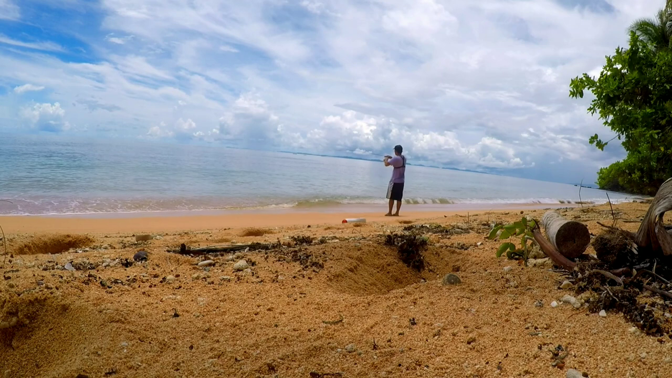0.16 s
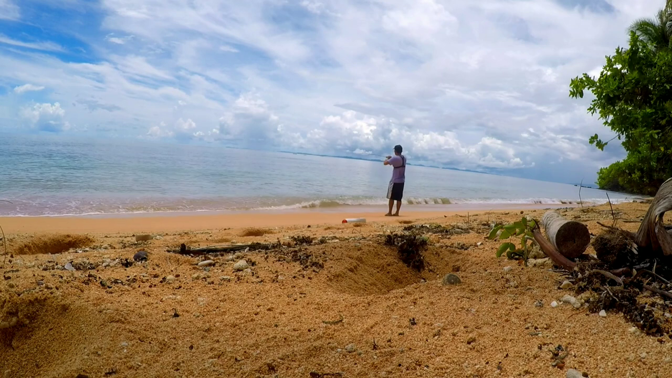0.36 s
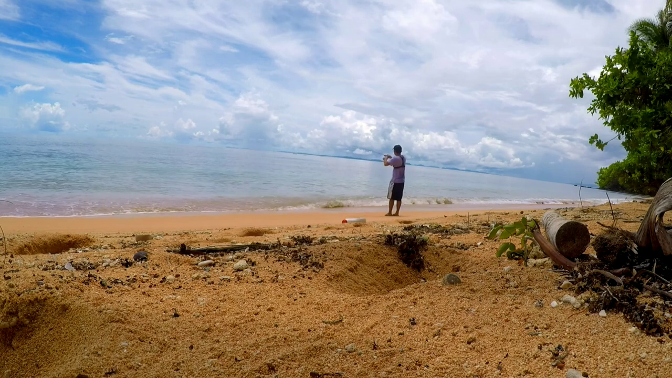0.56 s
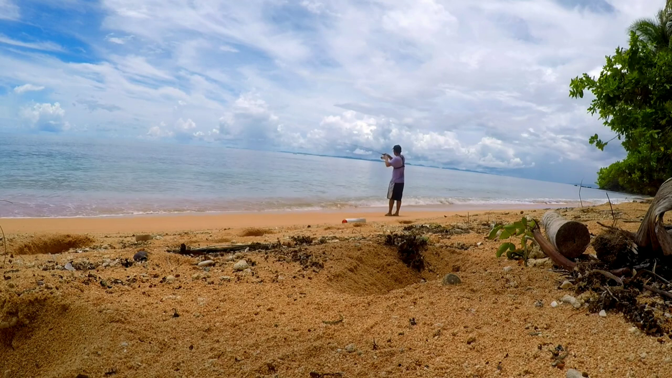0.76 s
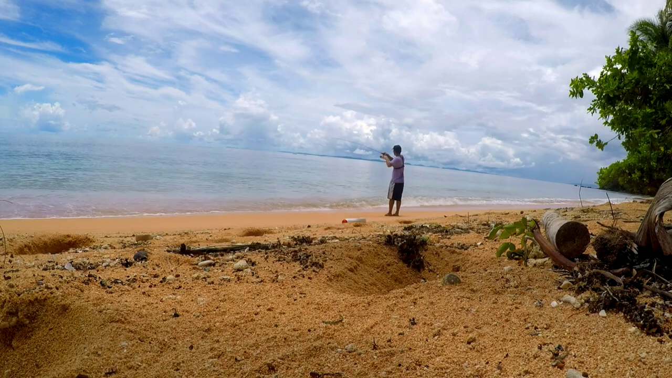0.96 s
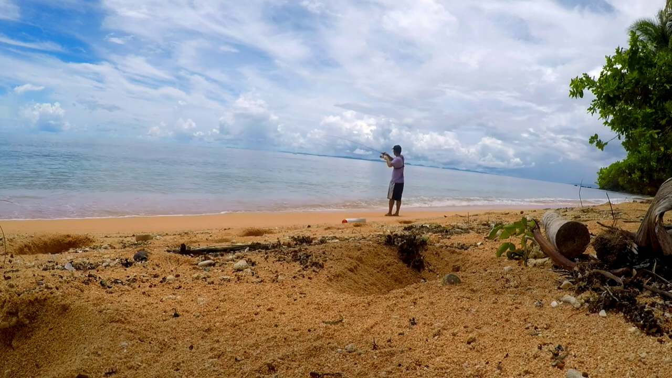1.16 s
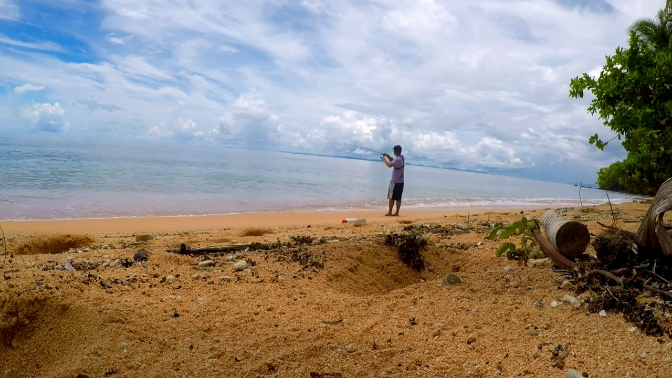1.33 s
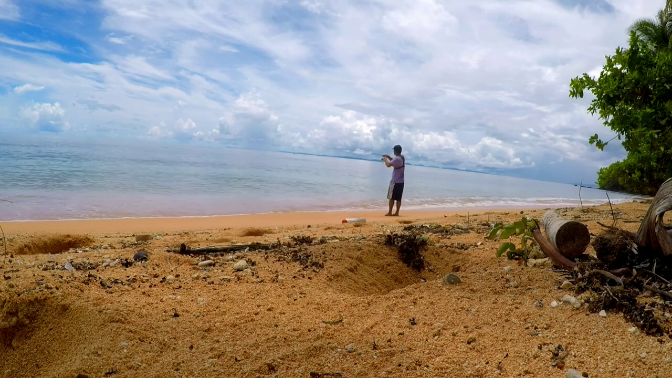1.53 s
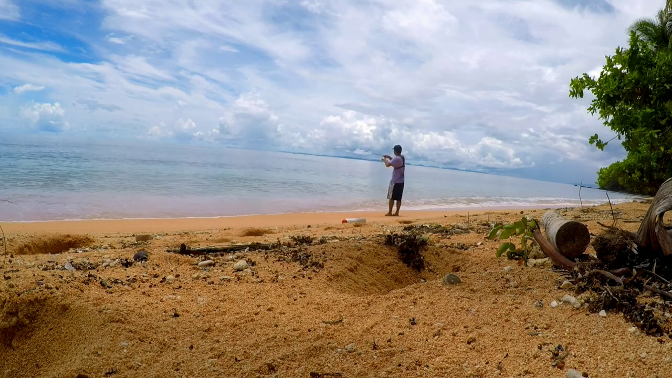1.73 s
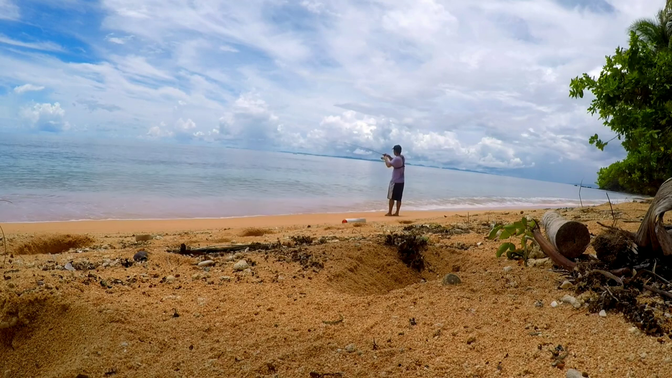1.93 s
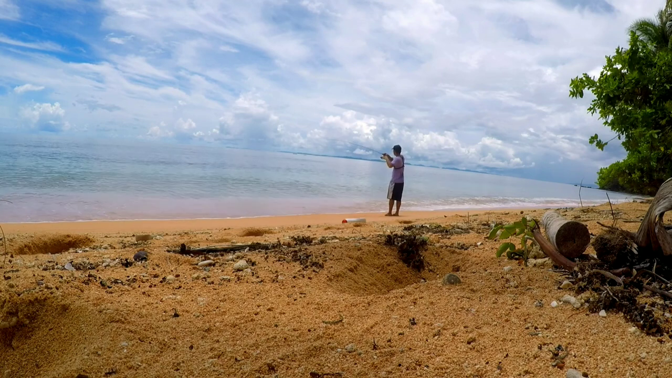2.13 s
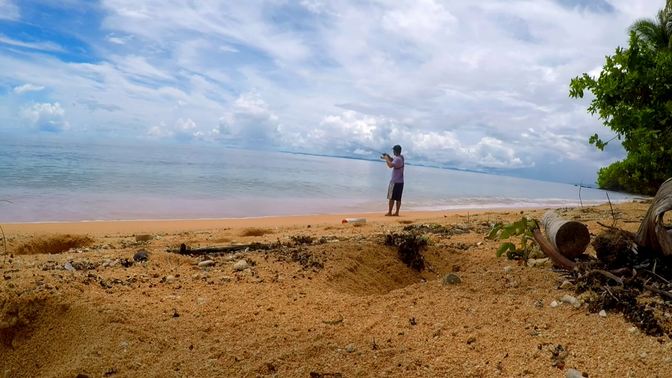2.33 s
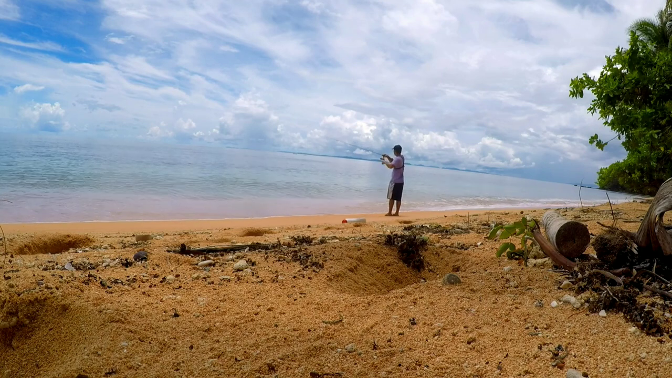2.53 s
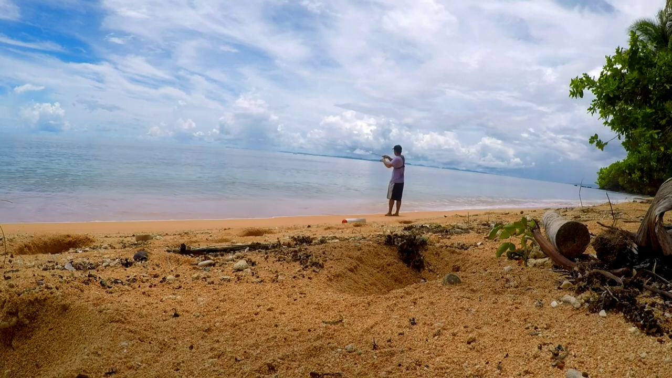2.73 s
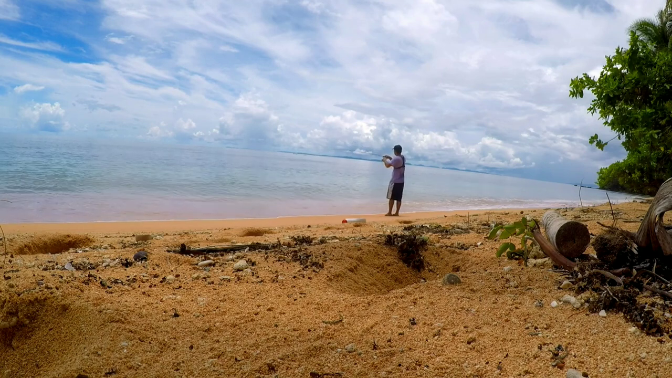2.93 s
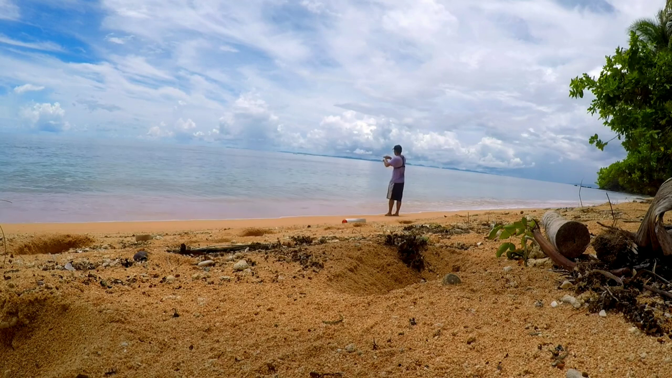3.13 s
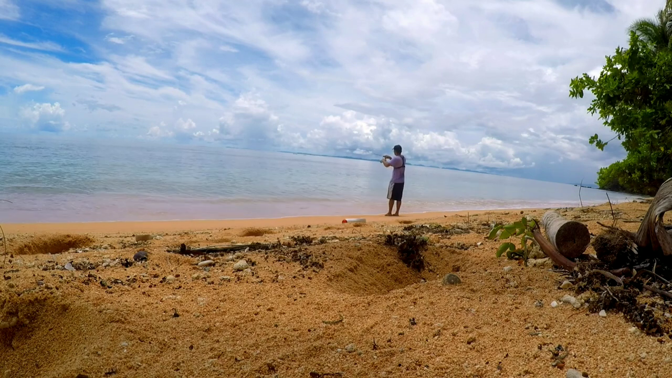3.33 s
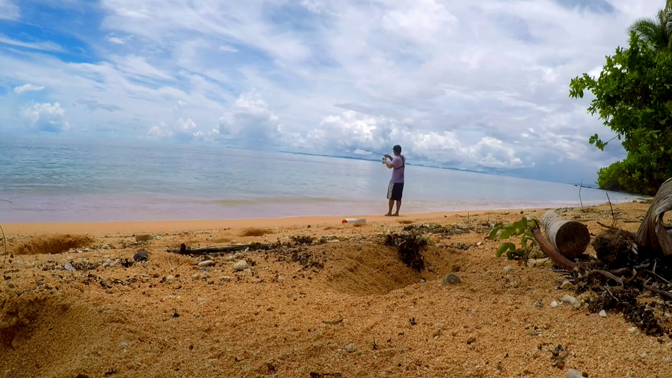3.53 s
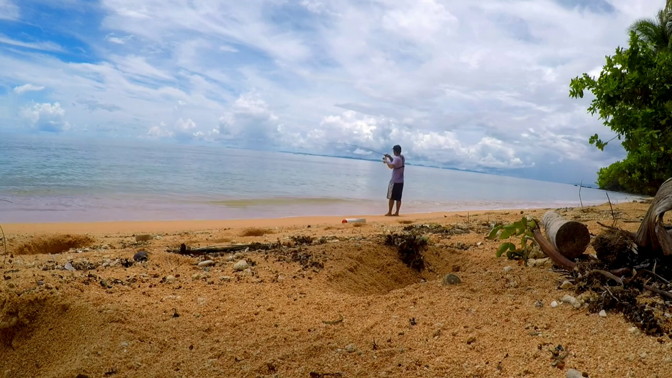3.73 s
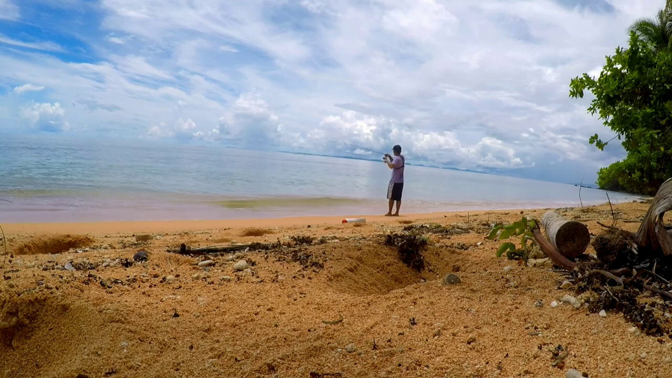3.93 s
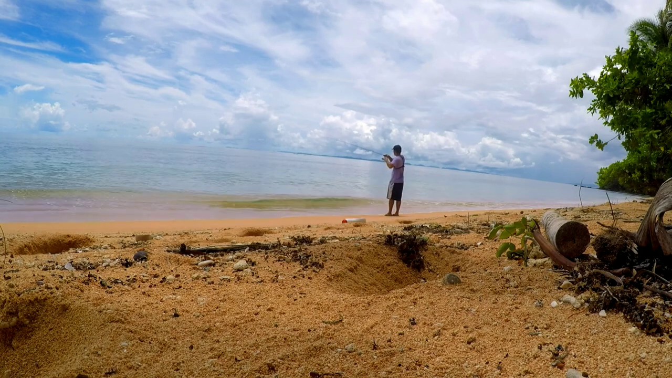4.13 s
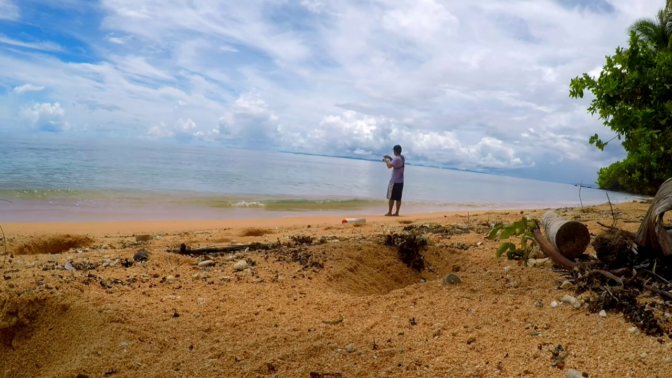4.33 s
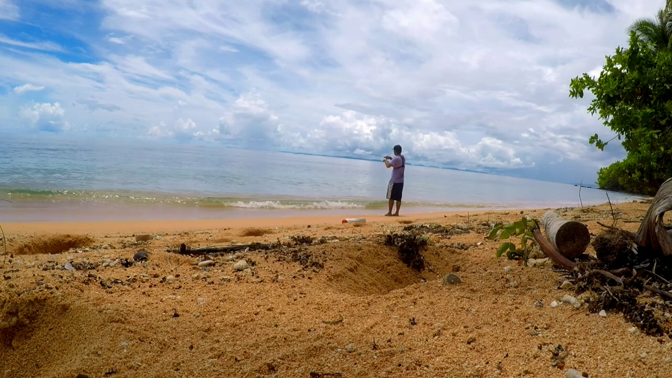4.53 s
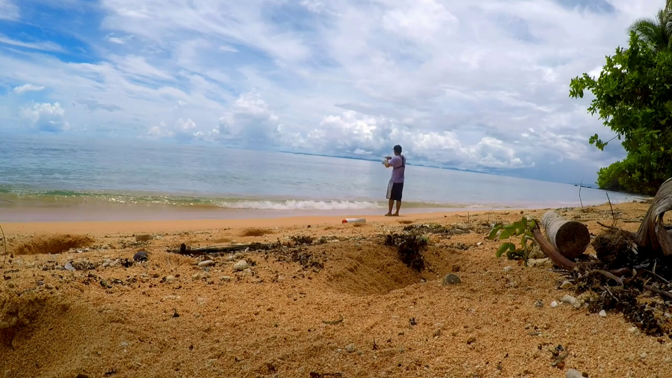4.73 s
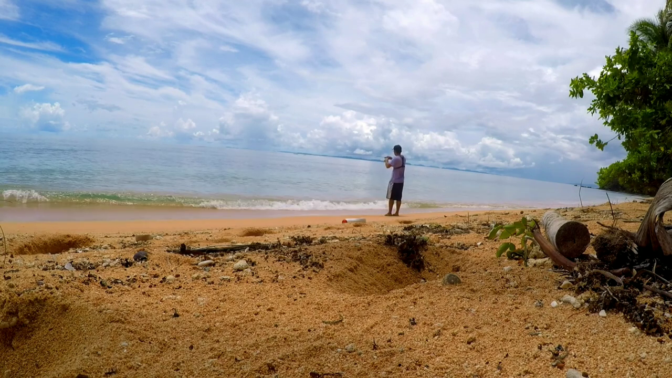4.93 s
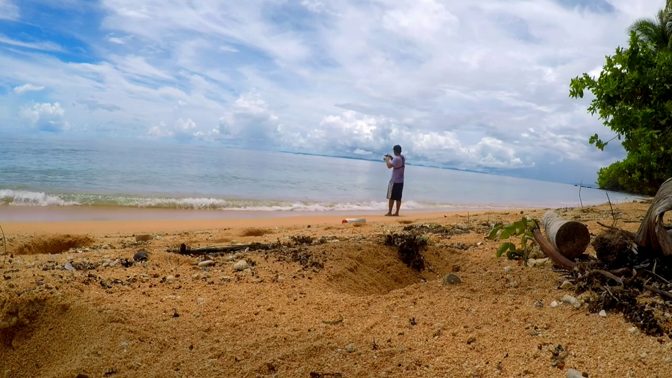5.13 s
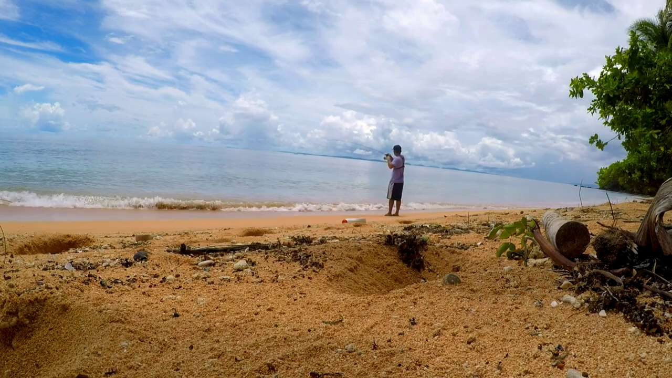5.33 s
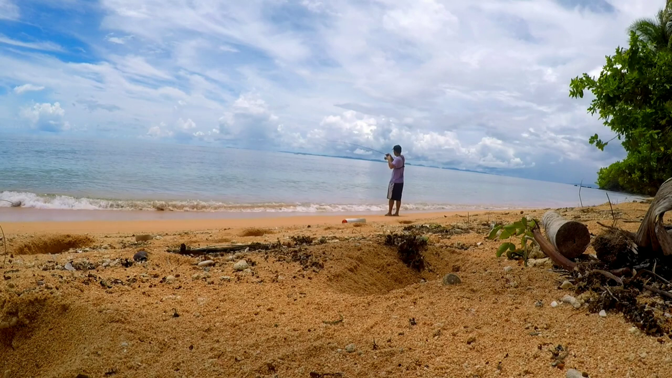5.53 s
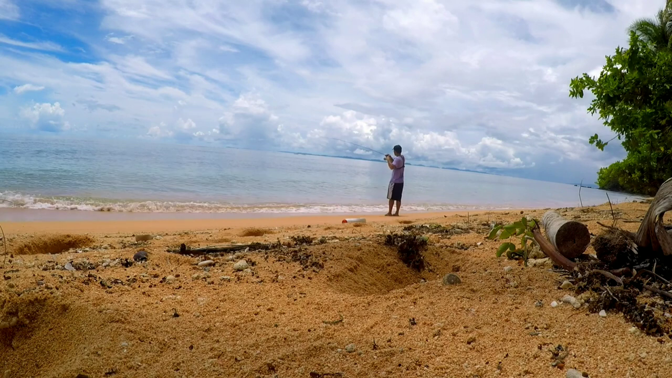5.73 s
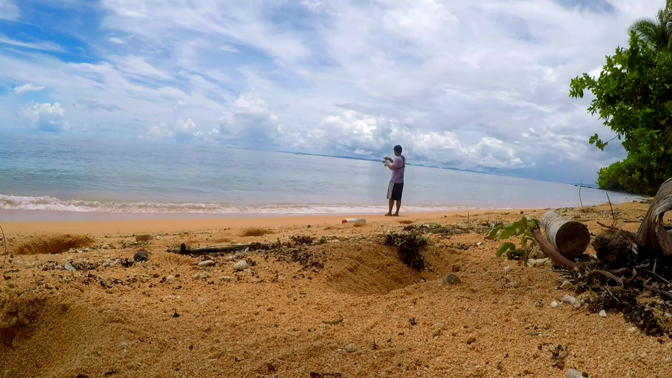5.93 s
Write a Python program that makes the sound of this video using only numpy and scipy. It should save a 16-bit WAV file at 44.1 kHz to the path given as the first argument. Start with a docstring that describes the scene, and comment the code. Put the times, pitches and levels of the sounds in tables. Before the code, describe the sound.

Stereo outdoor microphone near the water's edge: a low, throbbing distant motor hum and soft distant surf run throughout. A little wave slops and gurgles first, quietening for a couple of seconds. A weak ripple leads to a stronger breaker, starting at left and spreading across the front, full of bubbly knocks, splash and hissing foam. Barely noticeable wind; a bright, close water plop finishes it.

```python
"""A small wave breaks straight ahead on a sandy beach and a ripple follows; a second, louder one breaks
far left, then ahead, peeling off to the left. Filtered noise and ringing bubbles give each wave its churn,
gurgle, splash and fizzing foam; single bubbles make the thumps and a late plop. Beneath lie a far shoreline
of patchy noise, a distant engine of beating harmonics and faint wind of low noise."""
import sys
import numpy as np
from scipy import signal
from scipy.fft import rfft, irfft, next_fast_len
from scipy.io import wavfile
from scipy.ndimage import uniform_filter1d, map_coordinates

SR = 44100
rng = np.random.default_rng(int(sys.argv[2]) if len(sys.argv) > 2 else 0)


def master(y):
    """Save y as 16-bit WAV."""
    cut = np.clip(np.atleast_2d(y).T, -1, 1)
    pcm = np.round(cut * 32767)  # scale
    wavfile.write(sys.argv[1], SR, pcm.astype(np.int16))


N = 268128

# Stretches of crest that spill, peak and run out: peak_s, level_db, build_up_db_per_s, run_out_db_per_s
CRESTS_AHEAD = [(0.27, -48, 6, 6), (0.73, -43, 10, 16), (1.05, -51.5, 23, 20), (3.22, -53.5, 17, 10),
                (4.5, -42, 190, 5.5)]
CRESTS_FAR_LEFT = [(3.73, -55, 220, 3.5), (4.26, -47, 20.5, 8.5)]
CRESTS_PEELING = [(4.81, -41.5, 34, 5.6), (5.22, -38.5, 15.4, 18.5), (5.39, -38, 25, 30),
                  (5.6, -41.5, 23, 60), (5.98, -43, 21, 14)]
# Lumps of water that plunge and trap air: start_s, level_db, hold_s, cloud_pitch_hz
PLUNGES_AHEAD = [(0.157, -45, 0.13, 520), (0.337, -44, 0.16, 350), (0.55, -41.5, 0.088, 280),
                 (0.72, -45, 0.08, 260), (0.88, -44.5, 0.24, 402), (1.22, -49, 0.072, 300),
                 (3.277, -52, 0.23, 330), (4.46, -40.5, 0.14, 280)]
PLUNGES_FAR_LEFT = [(4.07, -41.5, 0.093, 295), (4.28, -40.5, 0.1, 450)]
PLUNGES_PEELING = [(4.8, -36.5, 0.16, 245), (5.06, -37, 0.05, 280), (5.18, -32.5, 0.1, 235),
                   (5.19, -38, 0.068, 600), (5.35, -34, 0.16, 196), (5.39, -35, 0.08, 580),
                   (5.55, -38, 0.28, 242), (5.93, -36.5, 0.085, 430)]
# Spectral shapes of a wave's voices: frequency_hz, relative_density_db
CHURN_SPECTRUM = [(30, -56), (80, -5), (140, -1), (260, 1.5), (350, 1), (450, -0.5), (590, -4),
                  (850, -20.5), (1500, -25)]
GURGLE_SPECTRUM = [(330, -22), (550, 0), (760, 0.5), (980, -3.5), (1350, -17)]
SPLASH_SPECTRUM = [(300, -14), (550, -2), (750, -2.5), (1120, 0.5), (1600, 0), (2200, -3.5), (3150, -1.5),
                   (4400, -9), (5500, -22.5), (9000, -48)]
FOAM_SPECTRUM = [(2500, -12.5), (4200, -5), (5000, -5.5), (5600, -2), (6400, -0.5), (7600, -3), (8100, -11),
                 (10000, -14), (11200, -25), (12500, -21.5), (15000, -35)]
BOOM_SPECTRUM = [(30, -45), (80, -30), (125, -31), (160, 11), (200, 2), (250, -0.5), (340, -39)]
# How each stretch of shore reaches the two ports:
# frequency_hz, left_right_likeness, left_over_right_db, left_lead_rad
IMAGE_AHEAD = [(150, 0.93, 0, 0.075), (348, 0.98, 2.5, -0.46), (680, 0.82, 0.5, -0.09),
               (1150, 0.66, -4, -0.02), (1680, 0.81, 0.5, 0.23), (2300, 0.51, -1.5, -0.54),
               (3000, 0.73, -3, -0.42), (3950, 0.99, 0.5, -0.12), (5000, .6, -0.5, -0.43),
               (6300, 0.55, 4.5, -0.67), (9000, 0.15, -2.5, -0.71), (13000, 0.2, 1, 0)]
IMAGE_FAR_LEFT = [(150, 0.9, 3, -1), (338, 1, 1.5, 0), (597, 0.68, 2, 0.9), (795, 0.83, 11, 1.3),
                  (1100, 0.25, 9, 3), (1900, 0.18, 5, 4.5), (2800, .4, 3, 5.1), (3950, .7, 2, 7.5),
                  (5130, .15, 5, 6.5), (6240, .15, 5, 10), (8900, .1, -3, 9), (13000, .05, 0.5, 10)]
IMAGE_PEELING = [(150, 1, 4, -0.2), (338, 0.97, 1.5, 0), (600, 0.91, 2.5, 0.0073), (760, 0.67, 4.5, 1.1),
                 (970, 0.4, 12, 1.26), (1310, 0.25, 7.5, 0.78), (1960, 0.064, 7.5, -0.23),
                 (2800, 0.65, 1.5, -0.76), (3950, 0.88, 1, -0.41), (5160, .35, 2, 0.52),
                 (6170, 0.3, 5, 1.3), (8900, 0.12, -3.5, 1.3), (13000, 0.061, -0.5, 0)]
# Air pockets gulped under the crests, and the falling drop's bubble: start_s, level_db, pitch_hz
THUMPS = [(0.32, -32, 195), (0.445, -29, 390), (0.572, -33, 237), (0.595, -35, 310), (0.738, -33, 228),
          (0.775, -32, 218), (0.93, -37, 260), (4.02, -33, 560), (4.042, -28.5, 506), (4.115, -32, 333),
          (4.24, -27.5, 272), (4.548, -29, 272), (4.807, -23, 225), (4.875, -24, 268), (5.06, -33, 297),
          (5.172, -32, 195), (5.224, -21, 159), (5.228, -22, 248), (5.442, -24, 165), (5.468, -23, 283)]
PLOP = [(6.06065, 3.2, 1520)]
# The far shoreline's spectral shape: frequency_hz, relative_density_db
FAR_SPECTRUM = [(30, -30), (100, 4.5), (180, 6), (250, 2.5), (480, -5.5), (720, -16), (1300, -17),
                (2200, -19), (3000, -20.5), (5000, -21), (6300, -14.5), (7600, -16.5), (8300, -18),
                (14500, -31.5)]
# The far shoreline at the ports: frequency_hz, left_right_likeness, left_over_right_db, left_lead_rad
FAR_IMAGE = [(150, 0.23, 4, 0.006), (425, -0.27, 1.5, 0), (740, -1.33, -0.8, 0), (1100, -1.06, 2.5, 0),
             (1700, -0.6, -0.5, 0), (3000, -0.04, -1.5, 0), (3950, 0.49, 1, 0), (4900, 0.056, .5, 0),
             (6300, 0.19, 0, 0), (9000, -0.042, -1, 0)]
# The engine's harmonics: multiple_of_shaft_rate, relative_level_db
ENGINE_HARMONICS = [(5, -5), (6, 2), (7, -5.5), (8, -15), (9, -19), (10, -19), (11, -13), (12, -13),
                    (13, -28), (14, -22), (15, -23.5), (16, -14), (17, -21), (18, -20.5), (19, -31.5),
                    (20, -25.5), (21, -33), (22, -38)]
# Tones beside the harmonic series: frequency_hz, relative_level_db
DRONE = [(183, -59.5), (242, -56)]
# The engine's speed: time_s, turns_per_s
SHAFT_SPEED = [(0, 27.96), (1.65, 27.92), (2, 28.04), (2.4, 27.93), (3.1, 27.97), (3.7, 28.24),
               (4.4, 28.12), (6.08, 28.18)]
# The hum swells and sinks on its way over the water: time_s, level_db
ENGINE_LEVEL = [(0, -44), (1.1, -43.5), (1.55, -43.5), (2, -44.5), (2.8, -42.5), (3.85, -42.5), (4.4, -42),
                (6.08, -41.5)]
# The wind's spectral shape: frequency_hz, relative_density_db
WIND_SPECTRUM = [(15, 1), (40, -12), (75, 8), (120, 5), (250, -33)]
# The microphone's wind filter: frequency_hz, gain_db
LOW_CUT = [(112, -16), (128, -9.5), (137, -0.5)]

# Each voice's level at the reference spill, and its gain in dB per dB of spill
SPILL_REF_DB = -42
CHURN_DB, CHURN_GROWS = -41.5, 0.87
GURGLE_DB, GURGLE_GROWS = -45, 1.24
FOAM_DB, FOAM_GROWS = -42.5, 1.13
BOOM_DB, BOOM_GROWS = -49.5, 1.6  # follows the plunges alone
PLUNGE_RISE_DB_PER_S, PLUNGE_FALL_DB_PER_S = 300, 150
CLOUD_Q = 1.34  # sharpness of a bubble cloud's resonance
PLOP_LEAN_DB, PLOP_RIGHT_DELAY_S = 2.5, 0.00026  # left over right; lag of the right port
SLAP_S, SLAP_DB = 0.00014, -16  # the drop's contact: time constant, level beside the bubble
TOP_HZ = 14800  # upper band limit


def amp(db):
    """A level in decibels is 20 log10 of its amplitude ratio."""
    return 10 ** (np.asarray(db) / 20)


def unit(x):
    """Division by the root mean square normalizes a signal's power."""
    return x / np.sqrt(np.mean(x ** 2) + 1e-20)


def along(points, hz):
    """Logarithmic frequency interpolation reads each column after the first."""
    f, *columns = np.transpose(points)
    return [np.interp(np.log(hz + 1), np.log(f + 1), column) for column in columns]


def wobble(rate):
    """Interpolation between random knots, rate of them a second, gives a smooth fluctuation."""
    knots = rng.standard_normal(int(N * rate / SR) + 4)
    return map_coordinates(knots, [np.arange(N) * rate / SR])


def filtered(x, response):
    """Linear filtering is multiplication by a frequency response."""
    size = next_fast_len(N + SR // 2)
    hz = np.fft.rfftfreq(size, 1 / SR)
    return irfft(rfft(x, size) * response(hz), size)[..., :N]


def placed(pair, spectrum, image):
    """Interaural coherence: two unrelated signals mix into left and right, their middle shaped to rms 1."""
    def ports(hz):
        alike, lean_db, lead = along(image, hz)
        turn = np.arccos(np.clip(alike, -.9, .99)) / 2
        left = amp(lean_db / 2) * np.exp(1j * lead)
        right = amp(-lean_db / 2)
        mix = np.array([[left * np.cos(turn), left * np.sin(turn)],
                        [right * np.cos(turn), -right * np.sin(turn)]])
        mix = mix / np.linalg.norm(mix.mean(0), axis=0)
        beyond = 1 + (hz / spectrum[-1][0]) ** 4  # roll-off above the last listed frequency
        return mix * amp(along(spectrum, hz)[0]) / np.sqrt(beyond)
    out = filtered(pair, ports).sum(1)
    return out / np.sqrt(np.mean(out.mean(0) ** 2))


def rush(patchy_db):
    """Turbulent noise: two unrelated noises share drifting patches of spectral colour."""
    bins = signal.stft(rng.standard_normal((2, N)), nperseg=512)[2]
    patches = rng.standard_normal(bins.shape[1:])
    patches = uniform_filter1d(patches, size=6, axis=0)  # across frequency
    patches = uniform_filter1d(patches, size=12, axis=1)  # across time
    noise = signal.istft(bins * amp(patchy_db * unit(patches)), nperseg=512)[1]
    return unit(noise[:, :N])


def ping(age, cycles, rise, onset=0.37):
    """Damped bubble resonance, age and onset in periods: 60 dB of decay in cycles as the pitch rises."""
    life = age / cycles
    tone = np.sin(2 * np.pi * age * (1 + rise * life / 2))
    return tone * amp(-60 * life) * (1 - np.exp(-age / onset))


def bubbles(low_hz, high_hz, cycles, spread_db, count):
    """Superposition of random bubble rings, pitched evenly by octave, makes two unrelated clouds."""
    when, pitch, size, side = rng.random((count, 4)).T
    hz = low_hz * (high_hz / low_hz) ** pitch
    n = np.arange(min(int(cycles * SR / low_hz), 2000))
    strength = amp(-spread_db * np.log(np.maximum(size, .01))) * hz
    grains = strength[:, None] * ping(hz[:, None] * n / SR, cycles, rise=0.39)
    at = (when * N).astype(int)[:, None] + n
    clouds = [np.bincount(at[k].ravel(), grains[k].ravel(), N)[:N] for k in (side < .5, side >= .5)]
    return unit(np.array(clouds))


def wave(crests, image, plunges):
    """Bubble size sets pitch: big pockets churn, middling ones gurgle, smaller splash, the finest foam."""
    churn_db, gurgle_db, splash_db, foam_db = wave_levels(crests)
    slosh_db = .25 * wobble(14)  # the crest falls in uneven lumps
    spray_db = .42 * wobble(16)  # spray is flung up in spurts
    churn = rng.standard_normal((2, N))
    churn += amp(-18.0) * bubbles(162.0, 737, cycles=8.3, spread_db=-0.5, count=1000)
    gurgle = rng.standard_normal((2, N))
    splash = rush(patchy_db=.5)
    splash += amp(-16.0) * bubbles(613, 4540, cycles=10, spread_db=2.0, count=3500)
    foam = rush(patchy_db=1.0)
    foam += amp(-9.5) * bubbles(4440, 15200, cycles=6.4, spread_db=0.0, count=12000)
    churn = amp(churn_db) * placed(churn, CHURN_SPECTRUM, image)
    gurgle = amp(gurgle_db) * placed(gurgle, GURGLE_SPECTRUM, image)
    splash = amp(splash_db) * placed(splash, SPLASH_SPECTRUM, image)
    foam = amp(foam_db) * placed(foam, FOAM_SPECTRUM, image)
    spray = amp(spray_db) * (splash + foam)
    return amp(slosh_db) * (plunging(plunges, image) + churn + gurgle + spray)


def wave_levels(crests):
    """Power-law scaling: each voice's level grows at its own rate with the power of the spill."""
    spill_db = 10 * np.log10(sum(swell(*crest) for crest in crests) + 1e-20)
    above_db = spill_db - SPILL_REF_DB
    churn_db = CHURN_DB + CHURN_GROWS * above_db
    gurgle_db = GURGLE_DB + GURGLE_GROWS * above_db
    foam_db = FOAM_DB + FOAM_GROWS * above_db
    return churn_db, gurgle_db, spill_db, foam_db  # the splash follows the spill itself


def swell(peak_s, db, rise, fall, hold_s=0):
    """Exponential growth and decay of power, rise and fall in dB per second, about a held peak."""
    age = np.arange(N) / SR - peak_s
    return amp(db + rise * np.minimum(age, 0) - fall * np.maximum(age - hold_s, 0)) ** 2


def plunging(plunges, image):
    """Collective resonance: each cloud of trapped air rings around its own pitch; heavy ones also boom."""
    clouds, power = np.zeros((2, N)), np.zeros(N)
    for start_s, db, hold_s, hz in plunges:
        surge = swell(start_s, db, PLUNGE_RISE_DB_PER_S, PLUNGE_FALL_DB_PER_S, hold_s)
        resonance = signal.iirpeak(hz, CLOUD_Q, fs=SR)
        cloud = signal.lfilter(*resonance, rng.standard_normal((2, N)))
        clouds += np.sqrt(surge) * unit(cloud)
        power += surge
    boom_db = BOOM_DB + BOOM_GROWS * (10 * np.log10(power + 1e-20) - SPILL_REF_DB)
    boom = amp(boom_db) * placed(rush(patchy_db=1.0), BOOM_SPECTRUM, [(170, 0.29, 8.8, 0.39)])
    cloud_rms = np.sqrt(np.mean(clouds ** 2))
    return boom + cloud_rms * placed(clouds, CHURN_SPECTRUM, image)


def drops():
    """Time and level differences: thumps reach both ports together, the plop at left reaches the right late."""
    thumps = pockets(THUMPS, cycles=26.5, rise=0.12, onset=0.98, delay=0) * amp([[1.5], [-1.5]])
    left = amp(PLOP_LEAN_DB / 2) * plop(0)
    right = amp(-PLOP_LEAN_DB / 2) * plop(PLOP_RIGHT_DELAY_S)
    return thumps + np.array([left, right])


def pockets(rows, cycles, rise, onset, delay):
    """Free oscillation of single large bubbles, each ringing at its own pitch."""
    t = np.arange(N) / SR - delay
    out = np.zeros(N)
    for start_s, db, hz in rows:
        alive = (t > start_s) & (t < start_s + 2 * cycles / hz)
        out[alive] += amp(db) * ping(hz * (t[alive] - start_s), cycles, rise, onset)
    return out


def plop(delay):
    """Impact and resonance: a drop slaps the surface and traps one small bubble."""
    (start_s, db, hz), = PLOP
    u = np.maximum(np.arange(N) / SR - delay - start_s, 0) / SLAP_S
    slap = amp(db + SLAP_DB) * u * np.exp(-u)
    return slap + pockets(PLOP, cycles=10.0, rise=0.08, onset=2.3, delay=delay)


def far_shore():
    """Incoherent summation: many distant wavelets merge into an even wash, modelled as patchy noise."""
    sway_db = .5 * wobble(3)
    return amp(-49.5 + sway_db) * placed(rush(patchy_db=1.2), FAR_SPECTRUM, FAR_IMAGE)


def engine():
    """Beating harmonics: exhaust pulses throb at the shaft rate and waver on their way over the water."""
    t = np.arange(N) / SR
    turns = np.cumsum(np.interp(t, *np.transpose(SHAFT_SPEED))) / SR + 0.003 * wobble(2.655)
    hum = np.zeros(N)
    for multiple, db in ENGINE_HARMONICS:
        # the exhaust spreads each pulse out in time, which softens the throb
        smear = -.85 * multiple ** 2
        waver_db = 0.091 * multiple * wobble(2.31)
        hum += amp(db + waver_db) * np.cos(2 * np.pi * multiple * turns + smear)
    for hz, db in DRONE:
        level = amp(db + 2.3 * wobble(3.25))
        hum += level * np.sin(2 * np.pi * hz * t + 1.05 * wobble(1.9))
    level_db = np.interp(t, *np.transpose(ENGINE_LEVEL))
    return hum * amp(level_db) * amp([[1.2], [-1.3]])  # leans left


def wind():
    """Turbulent pressure: a light breeze rumbles faintly on the ports as gusting low noise."""
    gusts_db = 2.5 * wobble(4.9)
    breeze = placed(rng.standard_normal((2, N)), WIND_SPECTRUM, [(60, .3, 3, 0)])
    return amp(-66.0 + gusts_db) * breeze


def scene():
    """Superposition of the near waves, from three stretches of beach, and the steady shore sounds."""
    ahead = wave(CRESTS_AHEAD, IMAGE_AHEAD, PLUNGES_AHEAD)
    far_left = wave(CRESTS_FAR_LEFT, IMAGE_FAR_LEFT, PLUNGES_FAR_LEFT)
    # the second crest peels away to the left as it breaks
    drift_db = 0.36 * (np.arange(N) / SR - 4.6)
    peeling = wave(CRESTS_PEELING, IMAGE_PEELING, PLUNGES_PEELING) * amp([drift_db / 2, -drift_db / 2])
    return ahead + far_left + peeling + drops() + far_shore() + engine() + wind()


def record(dry):
    """Band limiting: the microphone's wind filter cuts deep bass, and nothing passes above the top."""
    return filtered(dry, lambda hz: amp(along(LOW_CUT, hz)[0]) * (hz < TOP_HZ))


dry = scene()
out = record(dry)
master(out)
```